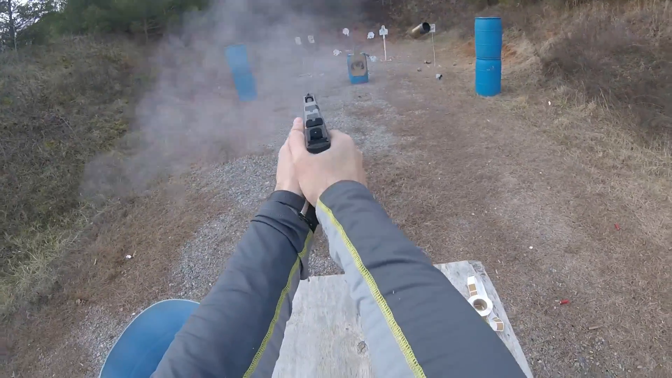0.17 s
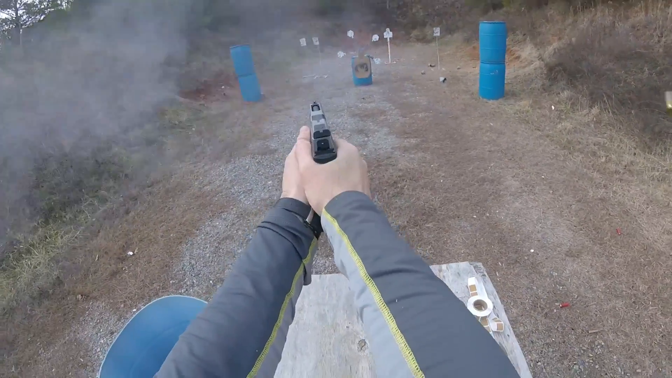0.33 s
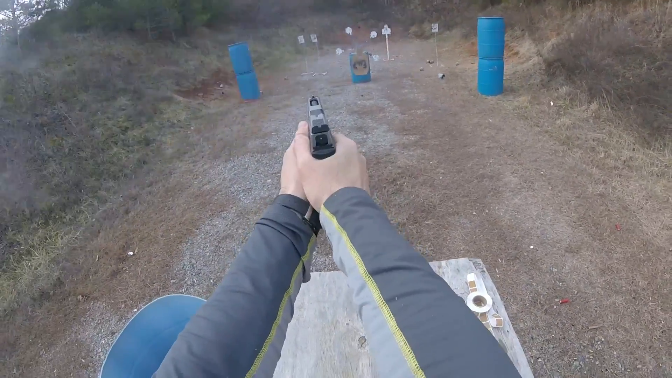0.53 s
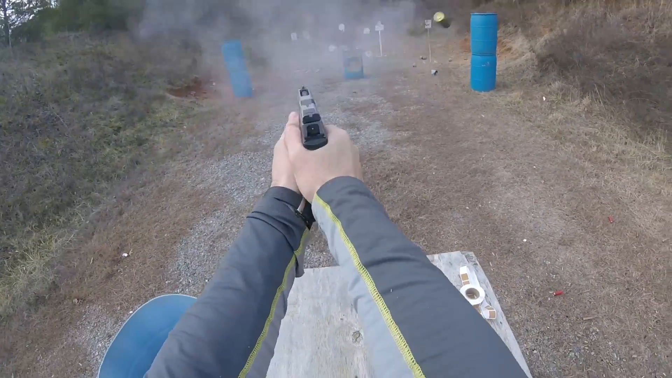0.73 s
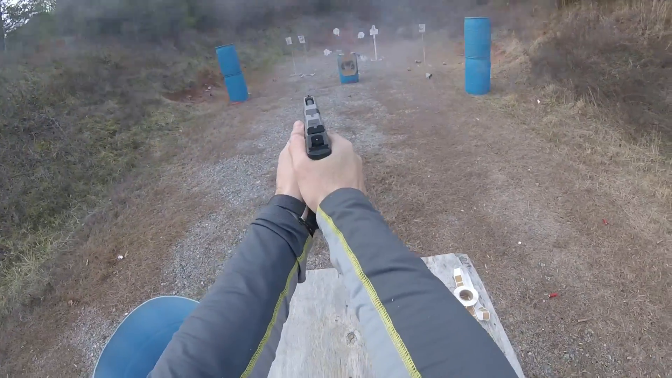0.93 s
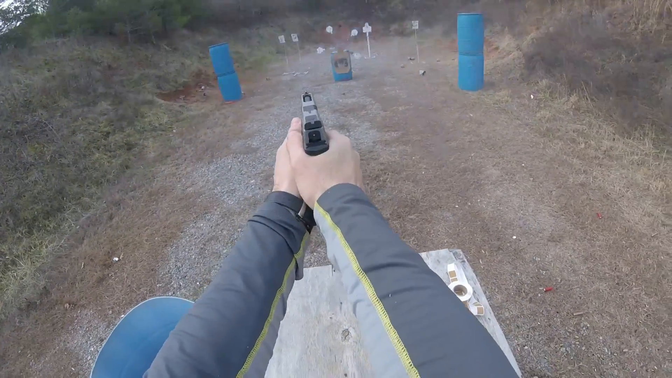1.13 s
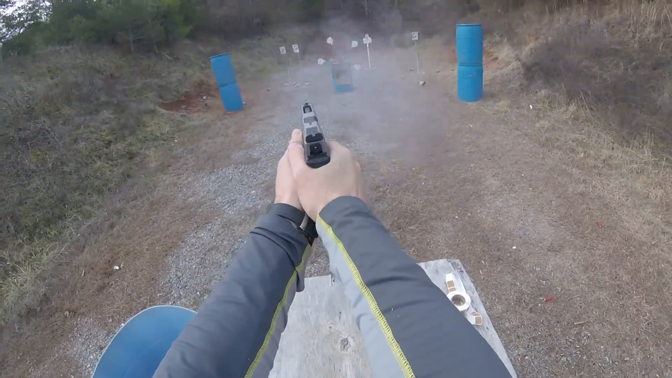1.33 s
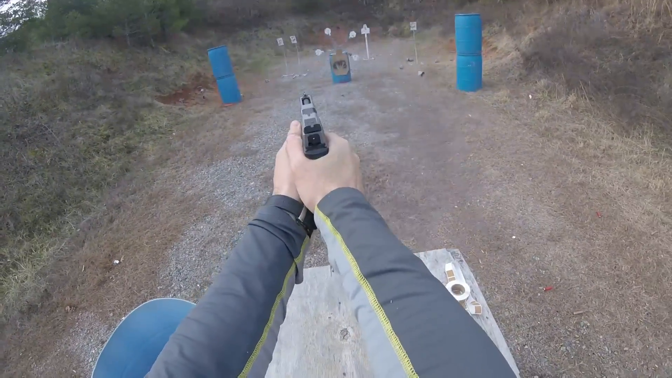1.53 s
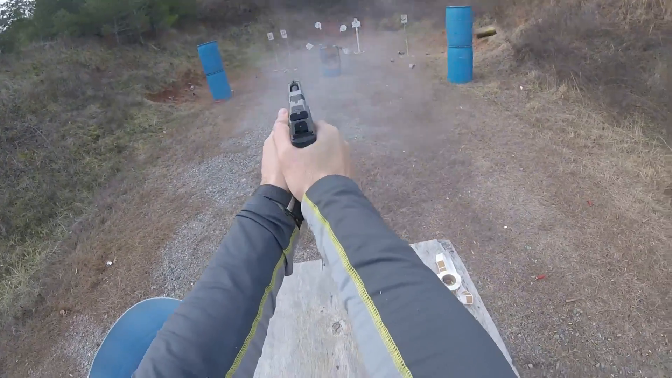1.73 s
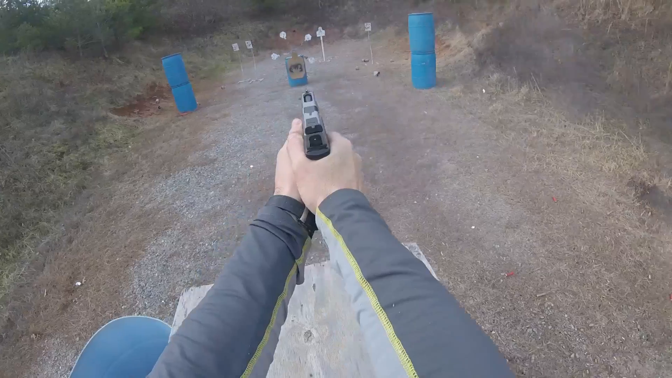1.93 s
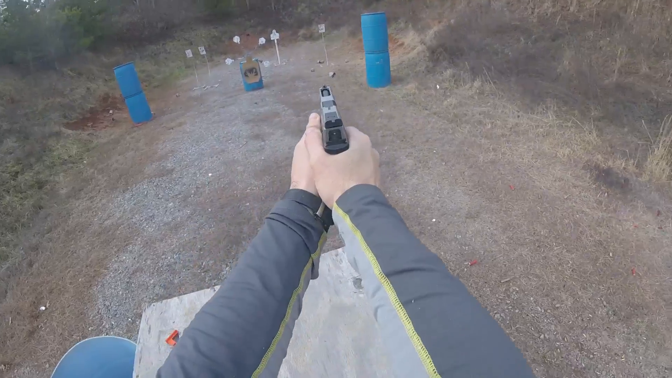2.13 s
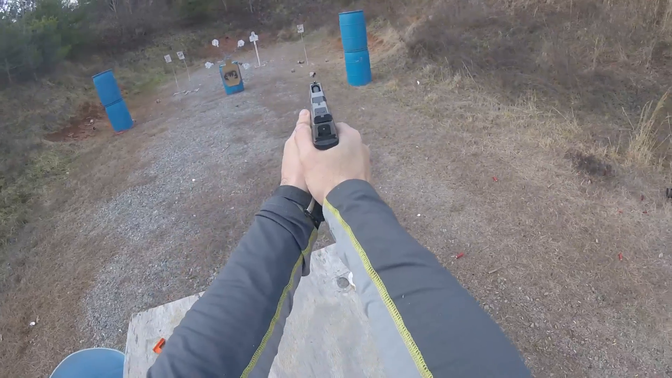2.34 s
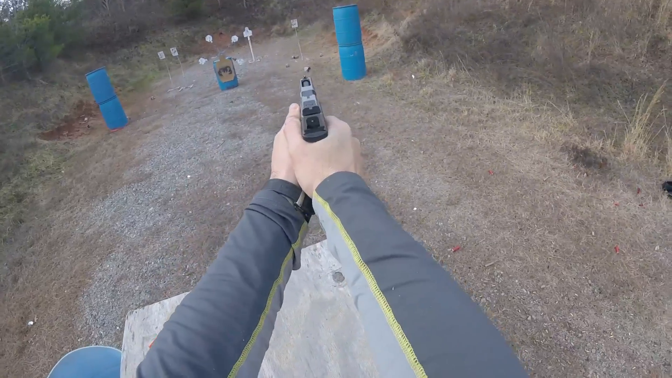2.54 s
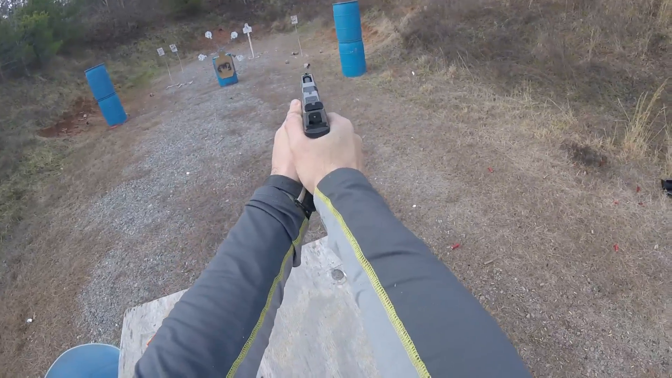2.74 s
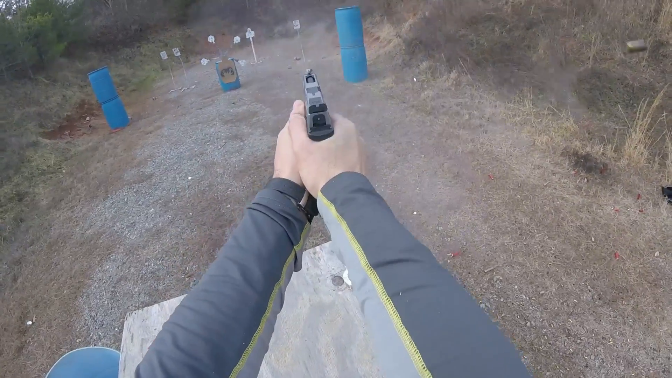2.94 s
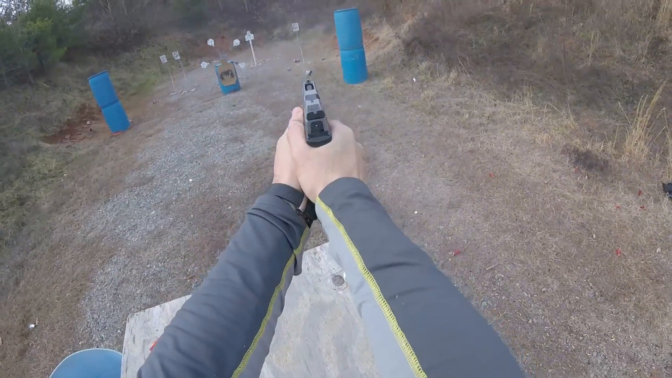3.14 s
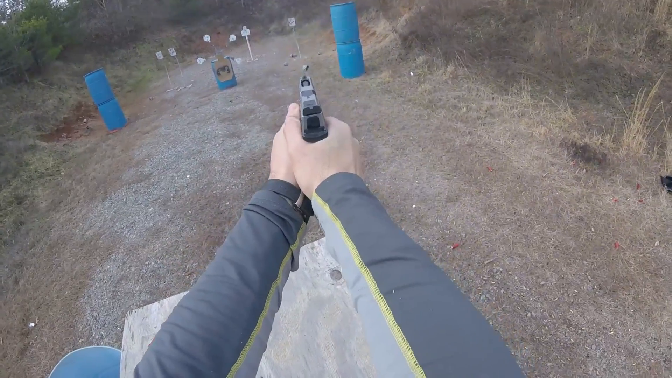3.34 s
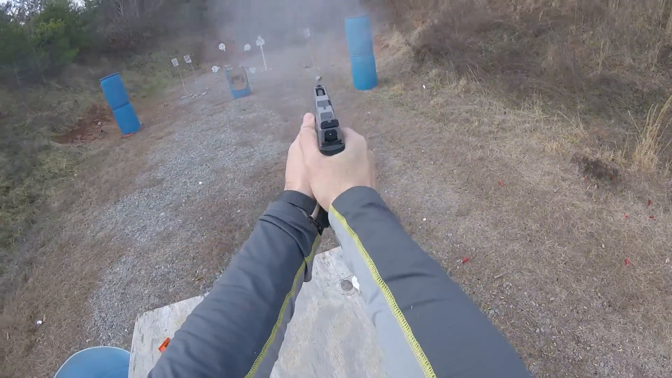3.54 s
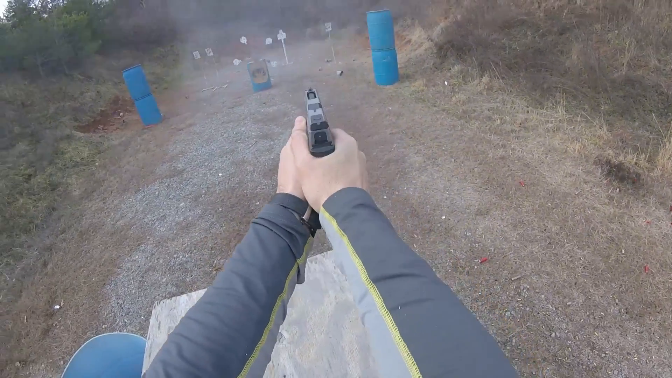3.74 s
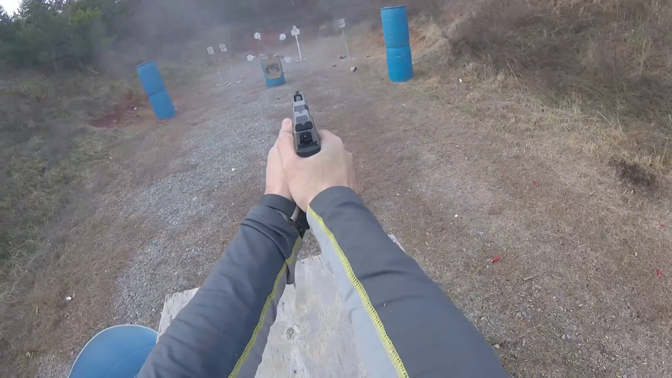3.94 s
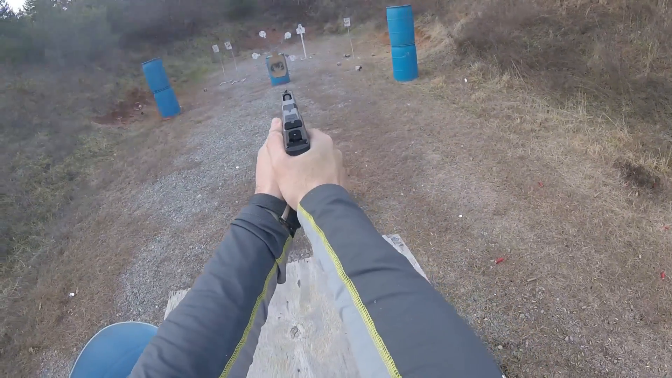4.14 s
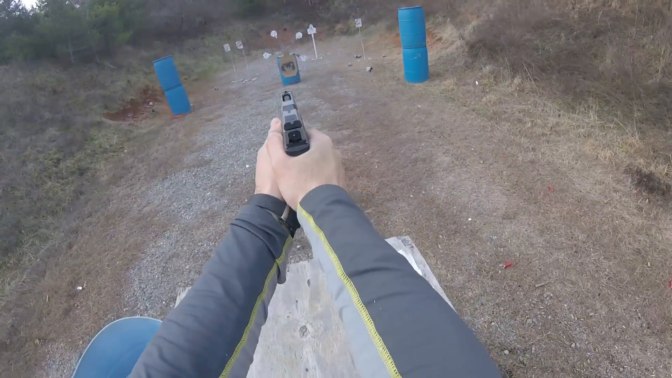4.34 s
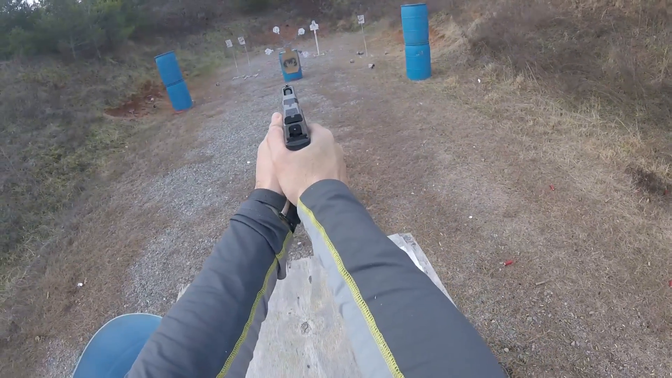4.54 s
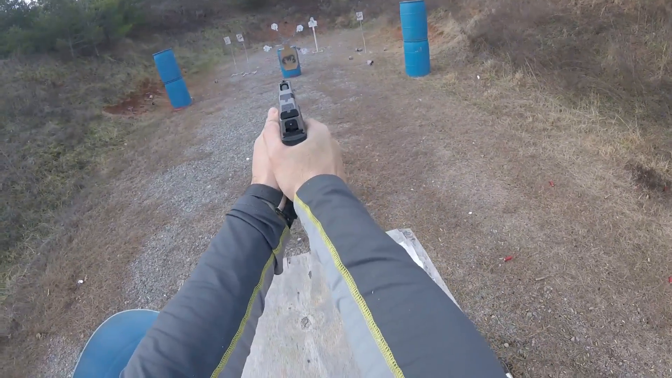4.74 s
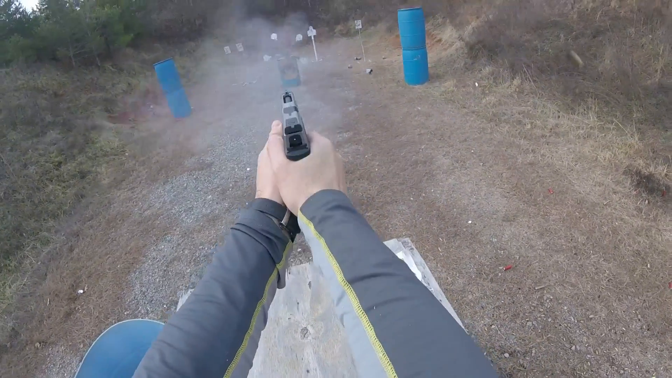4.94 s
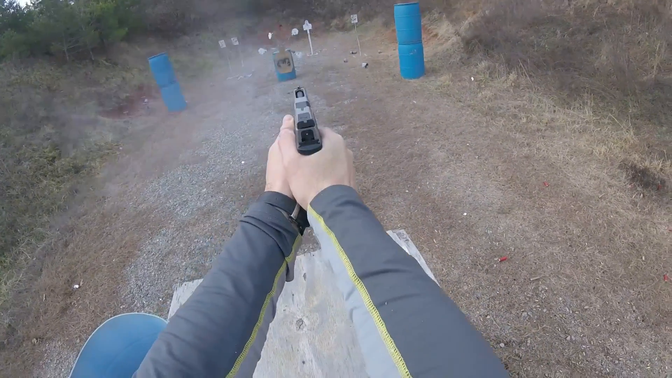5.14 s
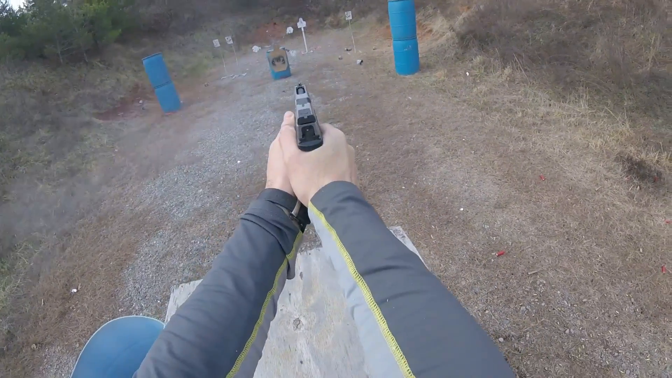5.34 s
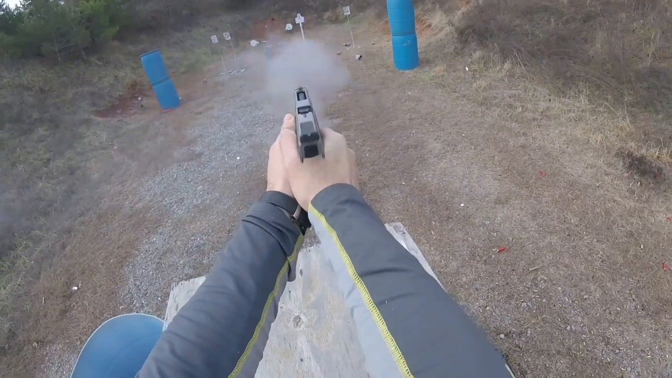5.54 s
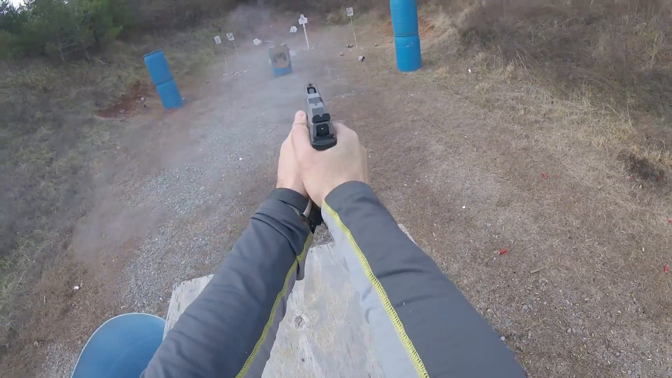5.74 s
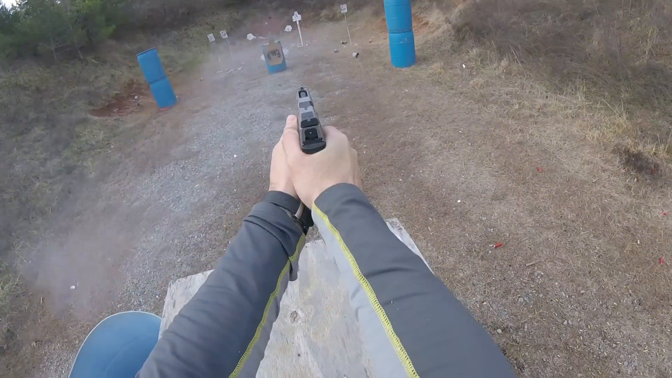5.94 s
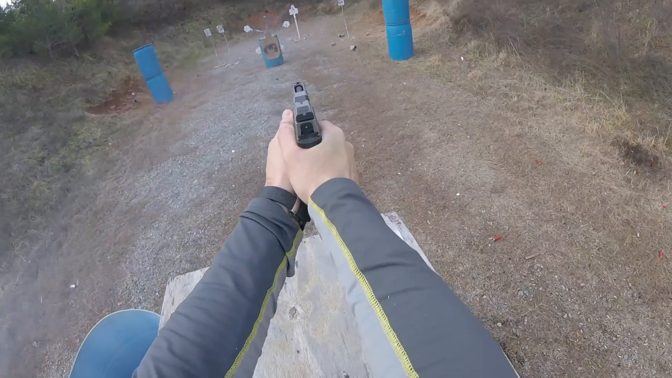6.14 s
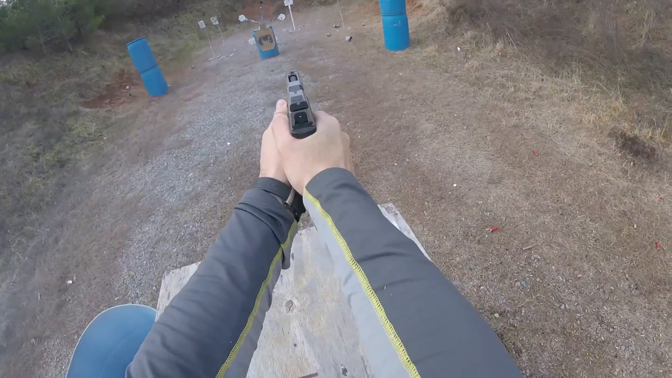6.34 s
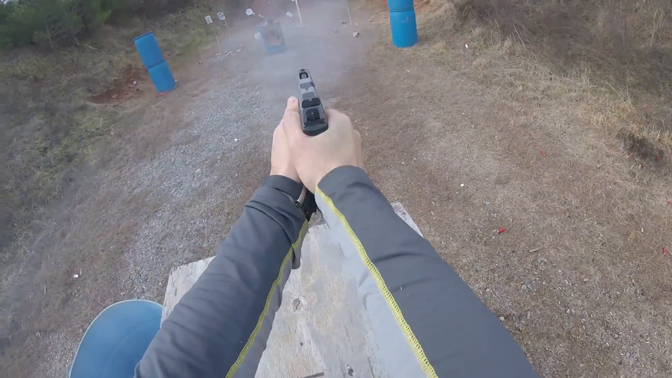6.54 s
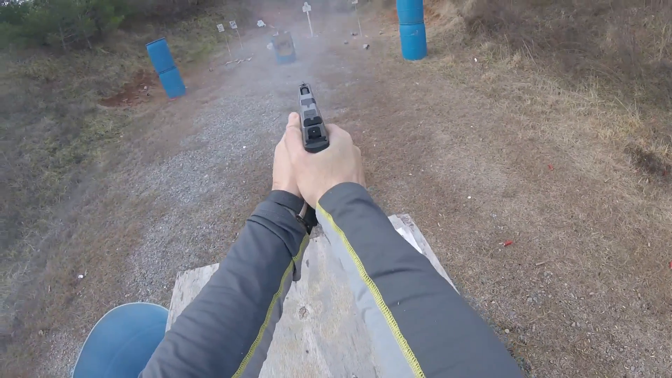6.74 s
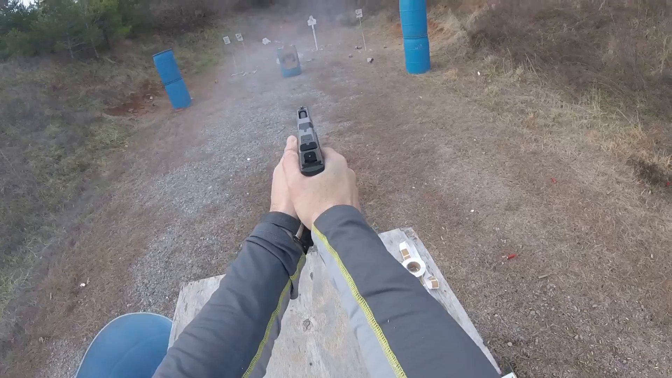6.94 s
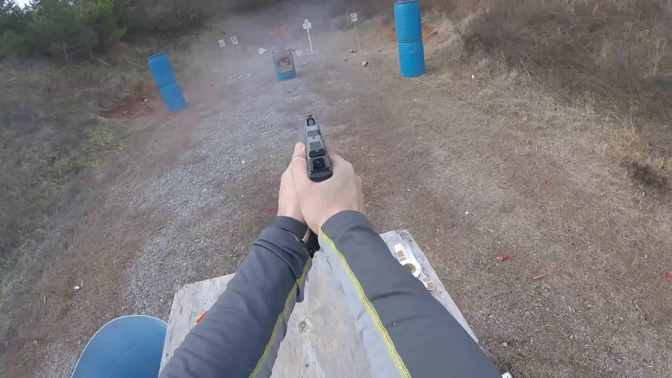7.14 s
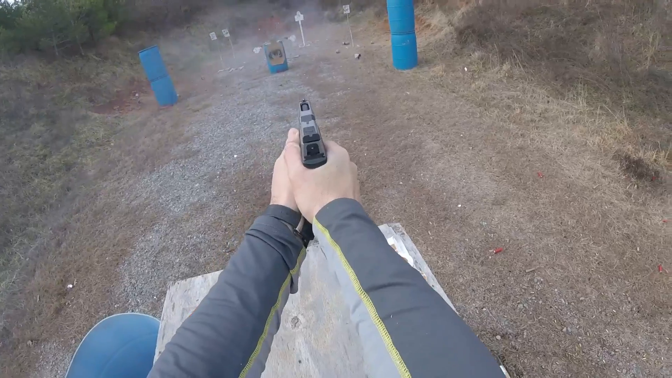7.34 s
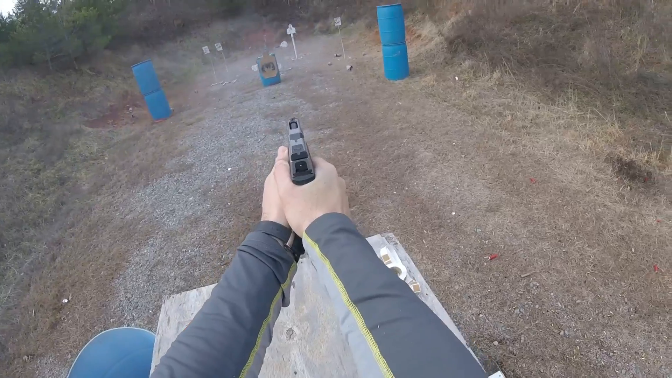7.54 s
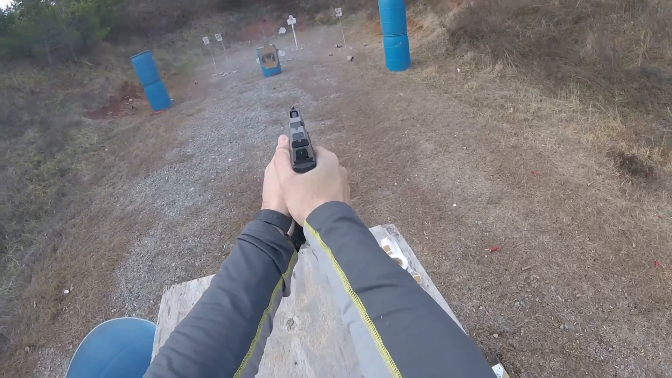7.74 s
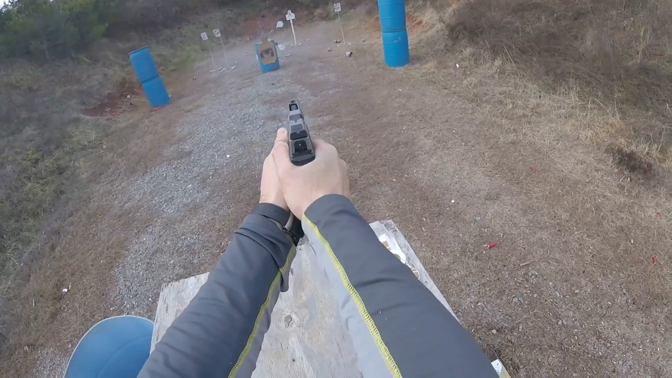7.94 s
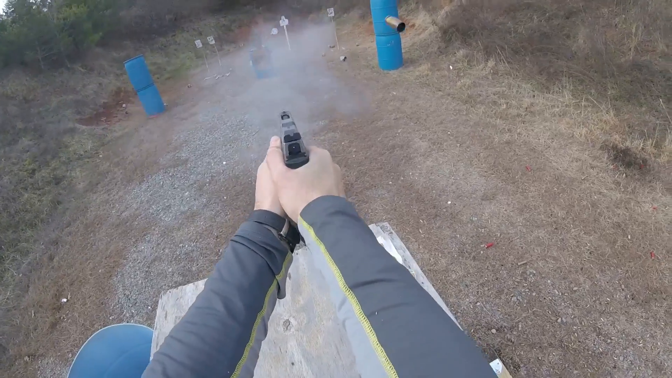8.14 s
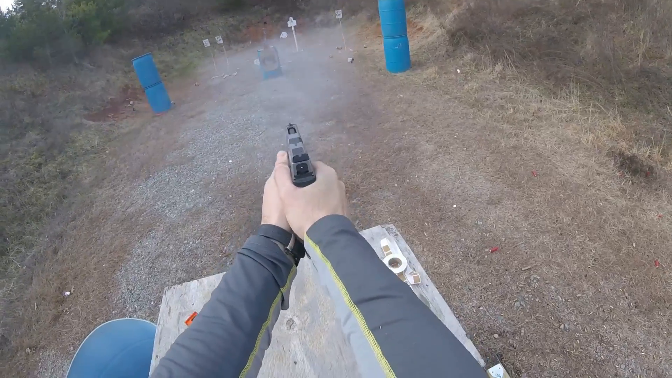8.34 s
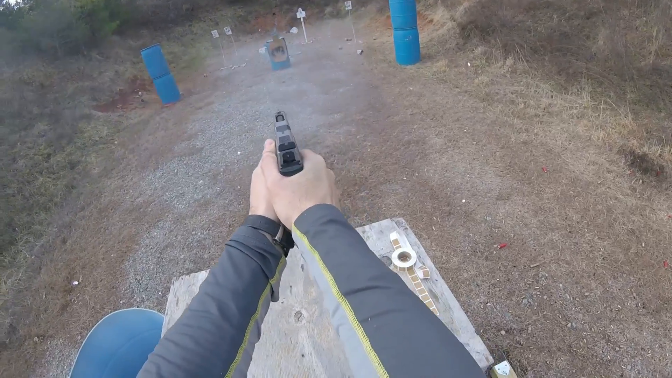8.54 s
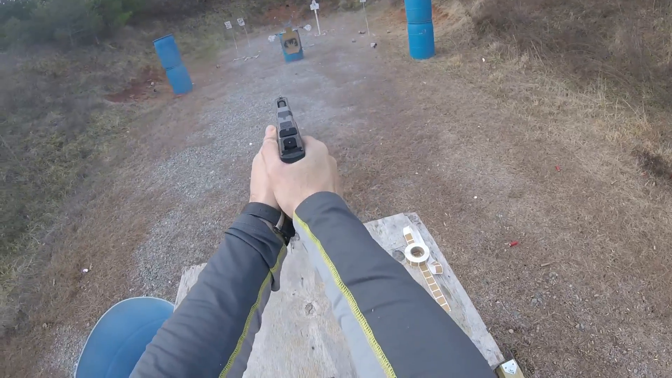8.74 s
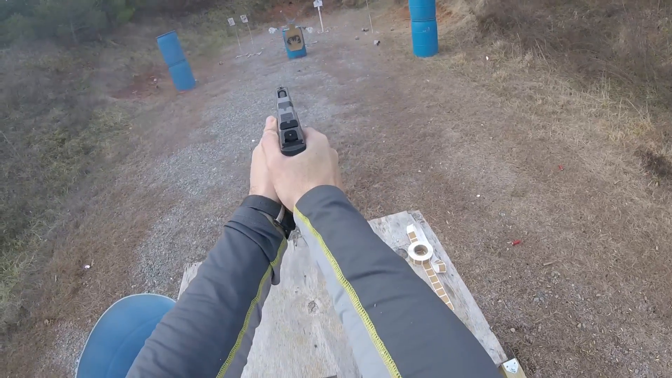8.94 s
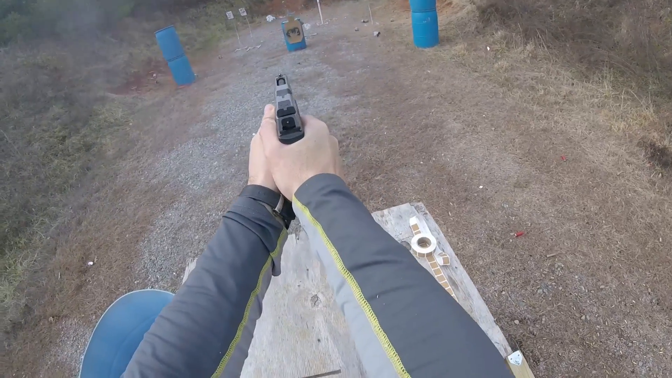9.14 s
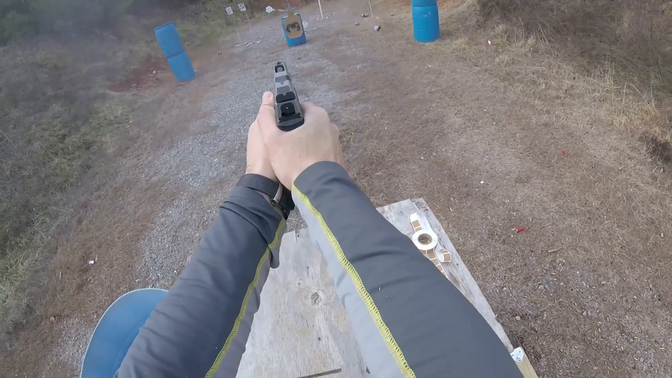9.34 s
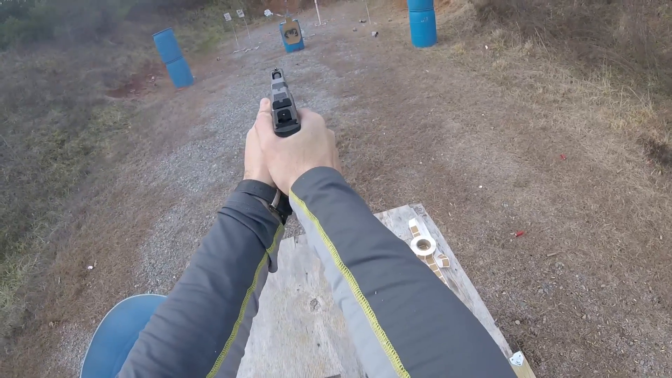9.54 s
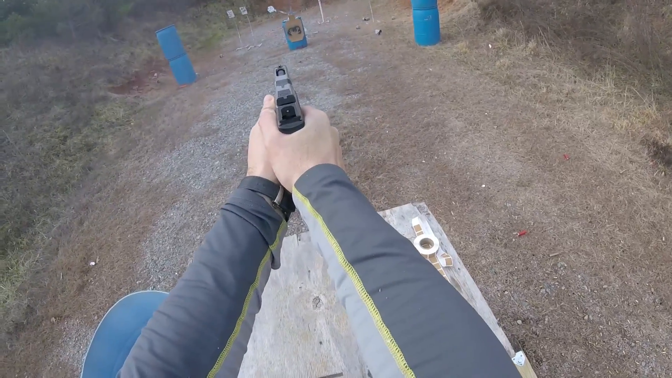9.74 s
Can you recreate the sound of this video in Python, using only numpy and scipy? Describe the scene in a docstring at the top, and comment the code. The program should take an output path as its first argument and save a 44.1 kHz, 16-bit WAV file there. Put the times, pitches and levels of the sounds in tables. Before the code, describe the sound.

Close to a microphone worn on the shooter's head, a pistol fires ten sharp, saturated blasts outdoors. Each has a low push, a slide snap and a rough echo off ground, banks and trees. Steel targets smack and ring almost at once. Four quick shots come first, then two, then four more widely spaced, one hitting a barrel with a hard knock. Cases tick faintly; wind rumbles low.

```python
"""Outdoor pistol range, ten shots heard at a microphone on the shooter's head.
Each blast is shock fronts, gas noise and a low push; table, ground, barrels, banks and trees echo it.
Steel targets are beating decaying modes under a smack; cases and knocks are short bursts of tuned noise.
Wind is coloured noise with gusts. The microphone saturates, and a limiter ducks just ahead of loud
peaks and recovers slowly."""
import sys
import numpy as np
from scipy import signal
from scipy.fft import rfft, irfft
from scipy.io import wavfile
from scipy.ndimage import uniform_filter1d, minimum_filter1d, map_coordinates

SR = 44100
rng = np.random.default_rng(int(sys.argv[2]) if len(sys.argv) > 2 else 0)


def generate_wav(signal):
    """Clip the signal to [-1, 1] and save it as 16-bit WAV at the path in sys.argv[1]."""
    frames = np.transpose(np.atleast_2d(signal))
    scaled = np.clip(frames, -1, 1) * 32767
    pcm = np.round(scaled).astype(np.int16)
    wavfile.write(sys.argv[1], SR, pcm)


N = 436149


def amp(db):
    """Decibels to gain."""
    return 10 ** (np.asarray(db) / 20)


def unit(x):
    """Scales to rms 1."""
    return x / np.sqrt(np.mean(x ** 2) + 1e-20)


def decay(t, t60_s):
    """Exponential decay of 60 dB in t60_s."""
    return np.exp(-np.log(1000) * t / t60_s)


def add(mix, start_s, sound):
    """Mixes a sound in at a time, cut at the end of the mix."""
    part = mix[max(round(start_s * SR), 0):][:len(sound)]
    part += sound[:len(part)]


def colour(x, points, size=8192):
    """Minimum-phase filter of the given spectral shape; white noise keeps its power."""
    hz, db = np.transpose(points)
    bin_hz = np.fft.rfftfreq(size, 1 / SR)
    gain_db = np.interp(np.log(bin_hz + 1), np.log(hz), db)
    cepstrum = irfft(np.log(amp(gain_db)))
    cepstrum[1:size // 2] *= 2  # fold to make it causal
    cepstrum[size // 2 + 1:] = 0
    taps = irfft(np.exp(rfft(cepstrum)))[:size // 2]
    taps /= np.linalg.norm(taps)
    return signal.fftconvolve(x, taps)[:len(x)]


def dull(x, edge_hz, order=1):
    """Butterworth low-pass, gentle at first order."""
    b, a = signal.butter(order, edge_hz, fs=SR)
    return signal.lfilter(b, a, x)


def drift(size, knots_per_s):
    """Smooth random curve: cubic spline through normal knots of unit variance."""
    t = np.arange(size) / SR
    knots = rng.standard_normal(256)
    return map_coordinates(knots, [t * knots_per_s], order=3, mode="mirror")


# gusts: (time of peak [s], level [dB], swell time constant [s])
GUSTS = [(0.132, -30.5, 0.041), (.635, -33, 0.016), (1.21, -41.5, 0.049), (2.83, -46, .33),
         (4.45, -58, 0.15), (5.62, -53.5, 0.08), (7.56, -42, 0.059), (7.77, -40, 0.053), (8.11, -34.5, .16),
         (8.65, -51, 0.14), (9.34, -46, 0.1)]
# wind noise spectrum: (frequency [Hz], level [dB])
WIND_SPECTRUM = [(12, -4.5), (30, 1.5), (55, -0.5), (120, -9.5), (220, -23.5), (400, -33), (1000, -57.5),
                 (5000, -93)]
# distant hush and microphone hiss spectrum: (frequency [Hz], level [dB])
AIR_SPECTRUM = [(88, -31.5), (150, -8), (361, -9.5), (398, -11.5), (448, -6.5), (589, -9.5), (716, -6),
                (998, -13.5), (1720, -16), (4670, -29), (5910, -27), (6640, -16.5), (12700, -37),
                (16000, -57.5)]
AIR_DB = -63.5
GUST_DROP_S = 0.04  # time constant
BREEZE_DB, BREEZE_SWING_DB, BREEZE_KNOTS_PER_S = -60.5, 3.5, 17


def outdoors():
    """Gusts add their power to an unsteady breeze at the microphone, over a steady hush."""
    t = np.arange(N) / SR
    breeze_db = BREEZE_DB + BREEZE_SWING_DB * drift(N, BREEZE_KNOTS_PER_S)
    power = amp(breeze_db) ** 2
    for peak_s, db, swell_s in GUSTS:
        time_constants = np.maximum((peak_s - t) / swell_s, (t - peak_s) / GUST_DROP_S)
        power += (amp(db) * np.exp(-time_constants)) ** 2
    wind = np.sqrt(power) * colour(rng.standard_normal(N), WIND_SPECTRUM)
    hush = amp(AIR_DB) * colour(rng.standard_normal(N), AIR_SPECTRUM)
    return wind + hush


# microphone response to small impacts: (frequency [Hz], level [dB])
IMPACT_RESPONSE = [(100, -0.5), (7000, 1.5), (9500, -5), (11500, -9), (13000, -32.5), (16000, -42)]


def tick(hz, t60_s, q=1.43):
    """Contact noise through one resonance, decaying exponentially."""
    t = np.arange(SR // 3) / SR
    b, a = signal.iirpeak(hz, q, SR)
    noise = signal.lfilter(b, a, rng.standard_normal(len(t)))
    return unit(colour(noise, IMPACT_RESPONSE)) * decay(t, t60_s)


# spent cases landing: (time [s], level [dB])
CASES = [(1.569, -42), (2.076, -35.5), (2.515, -43.5), (4.255, -45.5), (6.446, -46), (7.402, -45.5),
         (7.793, -54.5), (8.946, -32), (9.061, -39.5)]
CASE_HZ, CASE_T60_S = 6000, 0.011
# bullet on a barrel, toppled steel on the ground: (time [s], level [dB], pitch [Hz], t60 [s])
KNOCKS = [(5.7174, -4.5, 1630, 0.012), (5.803, -24, 4530, 0.0085), (7.013, -37, 3860, 0.056),
          (7.035, -48.5, 7020, 0.027), (7.176, -49.5, 3030, 0.19), (7.643, -48.5, 2464, 0.058)]


def debris():
    """Spent cases tick on the ground; bullet and falling steel knock as tuned noise, without modes."""
    out = np.zeros(N)
    for start_s, db in CASES:
        add(out, start_s, amp(db) * tick(CASE_HZ, CASE_T60_S))
    for start_s, db, hz, t60_s in KNOCKS:
        add(out, start_s, amp(db) * tick(hz, t60_s))
    return out


def brush(x, wet_db=-11, t60_s=0.1):
    """Brush and gravel around the targets scatter their sound, which frays the pure tones."""
    t = np.arange(SR // 2) / SR
    tail = rng.standard_normal(len(t)) * decay(t, t60_s)
    tail /= np.linalg.norm(tail)
    return x + amp(wet_db) * signal.fftconvolve(x, tail)[:len(x)]


# modes of each target, by name: (frequency [Hz], level [dB], undamped t60 [s])
STEEL_MODES = { "plate": [(1355, 1.5, 0.36), (1520, -2, .33), (2120, -13, .8), (3220, -5, .35),
               (4740, -0.5, 0.35), (5175, -4, 0.24), (5781, -20, 0.29), (6500, 2, 0.3), (7795, -9.5, 0.23)],
               "post": [(1504, -11.5, .1), (2650, -29, 0.072), (5110, 8, 0.027), (6700, -12, 0.073)],
               "fallen steel": [(707, -3.5, 1), (1080, -4.5, 0.48), (1850, -10.5, 0.99), (2207, -15, 0.33)],
               "disc": [(2157, -8.5, 0.84), (4510, -3.5, 0.47), (5840, -2, 0.32), (6596, -2, 0.58),
               (7530, -5, 0.35)], "rack": [(1341, -5.5, 0.2336), (1850, -7.5, 0.39), (3580, -10.5, .15),
               (3330, -14.5, 0.17), (4914, -3, 0.11), (5176, -8.5, 0.153), (7040, -4.5, 0.173),
               (7560, -25, .2)], "left popper": [(1775, -6, 0.33), (3325, -27.5, 1.2), (3906, -2, 0.89),
               (4100, -8, 0.49), (4254, -22, 0.97), (4620, -18, 0.89), (6530, -14, 1), (6814, -2, 0.56),
               (6880, 2.5, 0.51), (8620, -11, 0.31), (9060, -6, 0.57), (11100, -18, 0.33),
               (12500, -28, 0.43)], "middle popper": [(1860, -29, 2.6), (2400, -23.5, 3),
               (3351, -14.5, 1.1), (3933, -13, 2.1), (4125, 4.5, 0.43), (4650, -20.5, 1.5),
               (6530, -10, 1.25), (6880, 2.5, 1.07), (6980, 9.5, 0.43), (9060, -4.5, 0.85),
               (10590, -9.5, 0.54)], "popper base": [(1153, -4.5, 4.4), (1710, -4.5, 1.9), (2430, -2, 1.5),
               (3917, 3, 1.2), (4120, 1.5, 2.2), (4590, -0.5, 1.3), (6843, 10.5, 1.9)],
               "right popper": [(1790, 5.5, 0.29), (1800, -33.5, 3.2), (4128, -40, 3.2), (3405, -12, 0.56),
               (4100, -9, 0.58), (4170, 4.5, 0.57), (4650, -7, 0.53), (6600, -2, 0.37), (6750, 5.5, 0.47),
               (9040, -8, 0.37), (10690, -3.5, 0.49)]}


def steel_ring(target, t, bloom_s=0.028):
    """Each mode beats with a close twin and flutters; popper modes also bloom and sweep in lobes."""
    ring = np.zeros(len(t))
    for hz, db, t60_s in STEEL_MODES[target]:
        flutter_db = 1.4 * drift(len(t), 70) + drift(len(t), 20)
        twin_hz = hz + rng.uniform(8, 26)
        twin = np.sin(2 * np.pi * (twin_hz * t + rng.random()))
        pair = np.sin(2 * np.pi * hz * t) + 0.35 * twin
        if "popper" in target:  # lobes of sound sweep past as a tall plate falls
            lobe_hz = rng.uniform(6, 11)
            lobes = 1 + 0.5 * np.sin(2 * np.pi * (lobe_hz * t + rng.random()))
            pair *= lobes * (1 - np.exp(-t / bloom_s))
        ring += amp(db + flutter_db) * decay(t, t60_s) * pair
    return ring


# bullets and bumps: (time [s], target, smack level [dB], ring level [dB], time until damping [s])
STRIKES = [(0.2593, "post", -11.5, -11.5, .2), (.547, "rack", -30.5, -35.5, 0.1),
           (0.8429, "plate", -12.5, -29.5, .5), (1.091, "rack", -51, -55.5, 0.23),
           (1.3504, "disc", -9.5, -29.5, 0.48), (1.679, "rack", -39.5, -46, .2),
           (1.8345, "disc", -12, -27, 0.42), (2.9605, "plate", -8, -33.5, 0.25),
           (3.218, "plate", -37.5, -46.5, 0.036), (3.5336, "plate", -9, -29, 0.29),
           (4.9768, "left popper", -12.5, -20.5, 1.6), (5.309, "left popper", -48, -44, 0.13),
           (6.5911, "middle popper", -18, -25, 0.45), (6.8, "popper base", -62, -43.5, 0.213),
           (7.973, "fallen steel", -39.5, -51.5, 0.29), (8.2231, "right popper", -9, -23, 1.2),
           (8.584, "popper base", -47, -54, 0.032)]


def steel(smack_hz=4800, smack_t60_s=0.011, thud_db=-5, thud_hz=1000, thud_t60_s=0.045,
          settle_s=0.011, grounded_gain=0.047):
    """Bullets and bumps smack the steel; its ring is damped by the ground when the target lands."""
    out = np.zeros(N)
    t = np.arange(3 * SR // 2) / SR
    for start_s, target, smack_db, ring_db, free_s in STRIKES:
        settling = np.exp(-np.maximum(t - free_s, 0) / settle_s)
        damping = grounded_gain + (1 - grounded_gain) * settling
        hit = amp(ring_db) * steel_ring(target, t) * damping
        thud = amp(thud_db) * tick(thud_hz, thud_t60_s, q=1)  # relative to the smack
        add(hit, 0, amp(smack_db) * (tick(smack_hz, smack_t60_s) + thud))
        add(out, start_s, brush(hit))
    return out


# crack spectrum with microphone port resonances: (frequency [Hz], level [dB])
CRACK_SPECTRUM = [(100, -12), (900, -2), (1400, -5.5), (2300, -6.5), (3000, -0.5), (3900, -8), (4700, 2.5),
                  (5500, -4), (6500, -2.5), (7300, -9), (9000, -9), (10200, -21.5), (12500, -23.5),
                  (16000, -45)]


def blast(crack_db, push_db, gap_ms, push_hz=125, push_s=0.0035, swell_db=-11, swell_hz=40, swell_s=0.009,
          jet_db=3, jet_s=0.0011, jet_edge_hz=2500, shock=2.8, second_shock=7.2, second_edge_hz=4000,
          suction_db=20, suction_hz=400, suction_s=0.00079, port_hz=6600, port_q=30, port_db=0):
    """Shock and turbulent gas on a low pressure swing; a duller second front follows, with suction."""
    t = np.arange(SR // 20) / SR
    gap = round(gap_ms * SR / 1000)
    late = np.maximum(t - t[gap], 0)  # time since the second front
    jet = amp(jet_db) * np.exp(-t / jet_s) * rng.choice([-1, 1], len(t))
    gas = jet - dull(jet, jet_edge_hz)
    fronts = shock * (t == 0) + second_shock * dull(t == t[gap], second_edge_hz)
    crack = colour(fronts + gas, CRACK_SPECTRUM)
    b, a = signal.iirpeak(port_hz, port_q, SR)
    crack += amp(port_db) * signal.lfilter(b, a, crack)  # microphone port rings on
    push = np.sin(2 * np.pi * push_hz * t) * np.exp(-t / push_s)
    swell = amp(swell_db) * np.sin(2 * np.pi * swell_hz * late) * np.exp(-late / swell_s)
    suction = amp(suction_db) * np.sin(2 * np.pi * suction_hz * late) * np.exp(-late / suction_s)
    return amp(crack_db) * crack + amp(push_db) * (push - swell) - suction


# echo groups, in row order: shooter, table and gravel; side banks; brush behind the targets;
# back stop; a far bank; a second bank behind it; far trees
# (delay [s], rise time constant [s], t60 [s], level before echo spectrum [dB], treble edge [Hz])
SCATTER = [(.003, 0.00067, 0.11, -6.5, 3500), (.03, 0.044, 0.59, -23, 7000),
           (0.091, 0.077, .35, -27, 15000), (0.139, 0.025, 0.25, -19, 600), (.43, 0.0064, .15, -43.5, 1400),
           (.509, 0.0047, .12, -37.5, 800), (0.469, .05, 2, -46, 1718)]
# spectrum shared by all scattered echoes: (frequency [Hz], level [dB])
ECHO_SPECTRUM = [(60, -3.5), (250, -8), (500, 1), (800, 1.5), (1200, -4), (2000, -5.5), (3800, -8.5),
                 (5000, -6.5), (6600, -4), (7600, -10.5), (10000, -20.5), (13000, -30.5)]


def scatter():
    """Dense noise in clumps: countless small echoes off ground, banks, brush and trees."""
    t = np.arange(2 * SR) / SR
    out = np.zeros(len(t))
    for delay_s, rise_s, t60_s, db, edge_hz in SCATTER:
        age = np.maximum(t - delay_s, 0)
        clumps_db = 2.7 * drift(len(t), 120) + 1.8 * drift(len(t), 30)
        clumps_db += 4 * rng.standard_normal(len(t))
        echoes = unit(rng.standard_normal(len(t)) * amp(clumps_db))
        envelope = (1 - np.exp(-age / rise_s)) * decay(age, t60_s)
        out += amp(db) * dull(echoes, edge_hz) * envelope
    return colour(out, ECHO_SPECTRUM)


# shots: (time [s], crack level [dB], low push level [dB], second front delay [ms], echo level [dB])
SHOTS = [(0.1887, 10.5, 7.5, 2.44, 1), (.7730, 11, 9.5, 2.84, 0.5), (1.2834, 15, 17, 2.73, 1.5),
         (1.7670, 13.5, 12, 2.92, 1), (2.8969, 14, 10.5, 3.24, 1), (3.4717, 13, 16, 3.15, 1),
         (4.9157, 14, 8.5, 2.8, 1.5), (5.6677, 15.5, 14.5, 3.77, 0.5), (6.5283, 13, 10.5, 3, -1.5),
         (8.162, 14.5, 15.5, 3.03, 0)]
# single reflections off table, ground and barrels: (delay [s], level [dB], treble edge [Hz])
REFLECTIONS = [(.0062, -23.5, 1800), (.0105, -28, 3018), (.038, -28.5, 4010), (0.048, -26.5, 3020)]
SLIDE_DELAY_S = 0.0485


def pistol(slide_db=-9, slide_hz=6500, slide_t60_s=0.014):
    """Each blast with single reflections, scattered echoes and the snap of the slide closing."""
    out = np.zeros(N)
    for start_s, crack_db, push_db, gap_ms, echo_db in SHOTS:
        shot = blast(crack_db, push_db, gap_ms)
        add(out, start_s, shot)
        thin = shot - dull(shot, edge_hz=250)  # small surfaces return little bass
        for delay_s, db, edge_hz in REFLECTIONS:
            add(out, start_s + delay_s, amp(db + echo_db) * dull(thin, edge_hz))
        add(out, start_s, amp(echo_db) * scatter())
        snap = amp(slide_db) * tick(slide_hz, slide_t60_s, q=1)
        add(out, start_s + SLIDE_DELAY_S, snap)
    return out


def scene():
    """All sources summed at one microphone."""
    return (outdoors() + debris() + steel() + pistol())[None]


def record(dry, overload_db=20, limit_db=-1.5, ahead_s=0.046, recover_s=0.34, band_edge_hz=16400):
    """Microphone saturation, look-ahead limiter with exponential recovery, then a low-pass."""
    x = dry[0] / (1 + (dry[0] / amp(overload_db)) ** 6) ** (1 / 6)
    over_db = np.maximum(20 * np.log10(abs(x) + 1e-9) - limit_db, 1e-9)
    ahead = int(ahead_s * SR) // 2 * 2 + 1
    over_db = -minimum_filter1d(-over_db, ahead, origin=-(ahead // 2))  # highest level just ahead
    fall = np.arange(N) / SR / recover_s
    duck_db = np.exp(np.maximum.accumulate(np.log(over_db) + fall) - fall)  # peak hold that decays
    x = x / amp(uniform_filter1d(duck_db, size=64))
    low_pass = signal.firwin(255, band_edge_hz, window=("kaiser", 9), fs=SR)
    return signal.oaconvolve(x, low_pass, "same")[None]


dry = scene()
out = record(dry)
generate_wav(out)
```